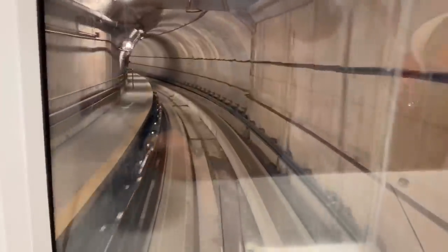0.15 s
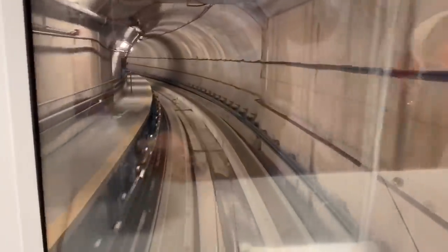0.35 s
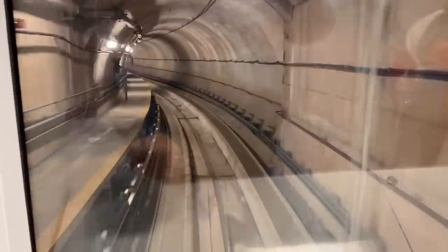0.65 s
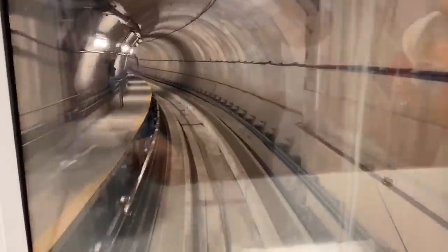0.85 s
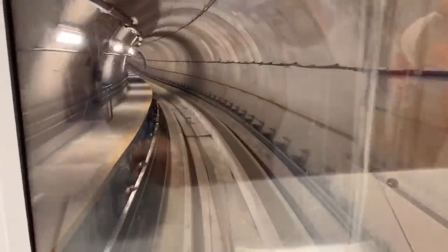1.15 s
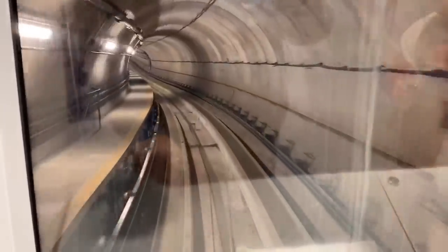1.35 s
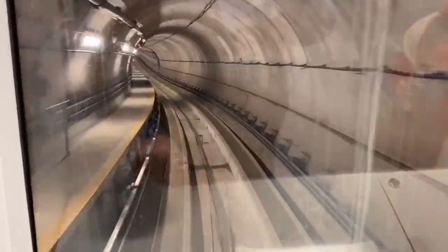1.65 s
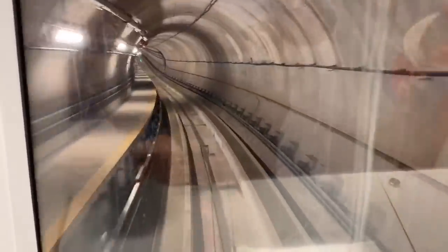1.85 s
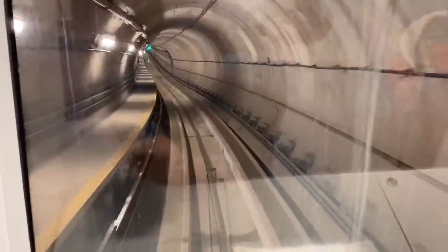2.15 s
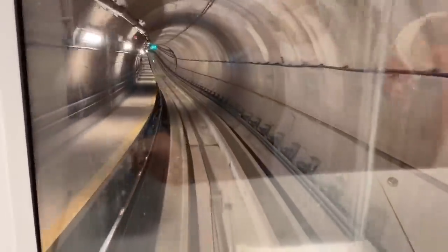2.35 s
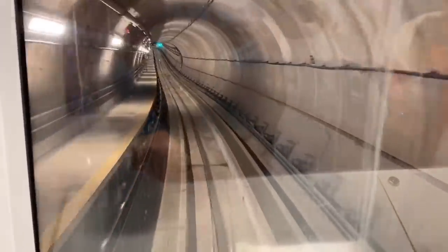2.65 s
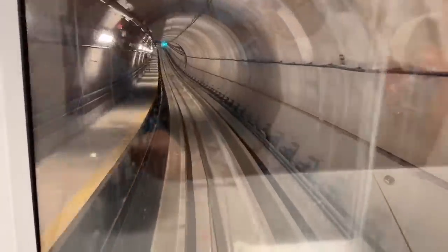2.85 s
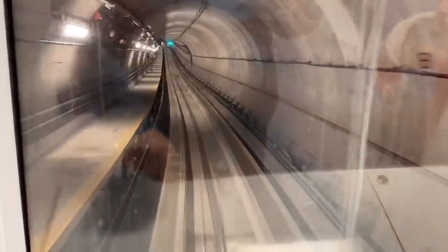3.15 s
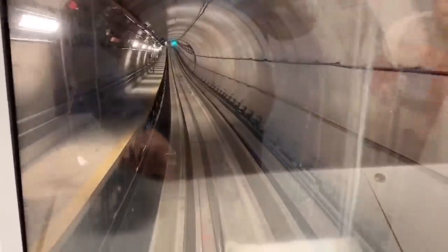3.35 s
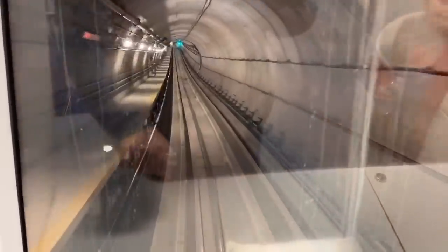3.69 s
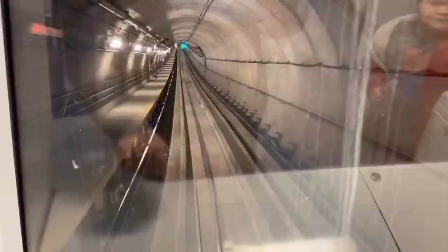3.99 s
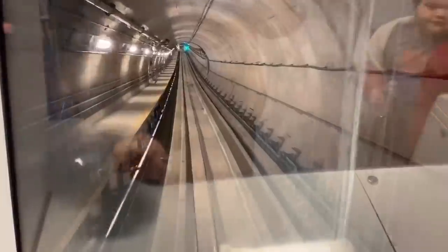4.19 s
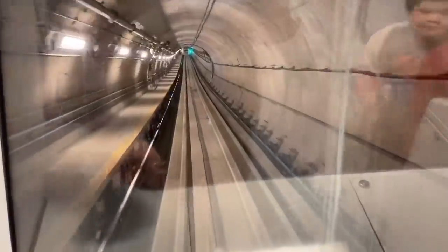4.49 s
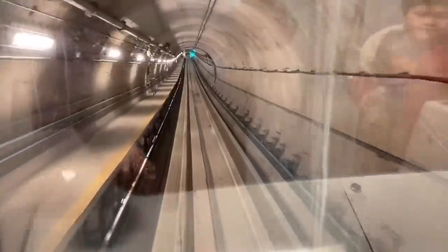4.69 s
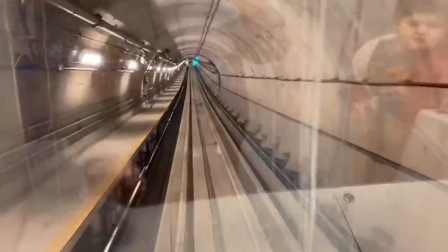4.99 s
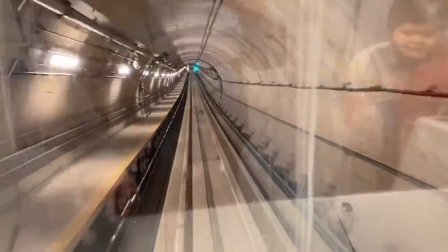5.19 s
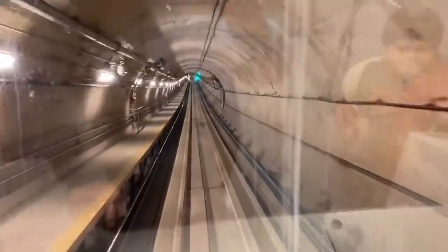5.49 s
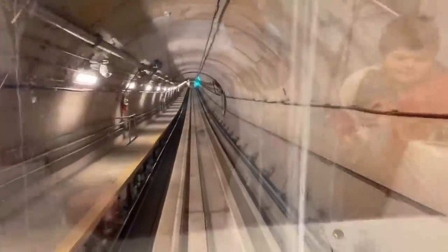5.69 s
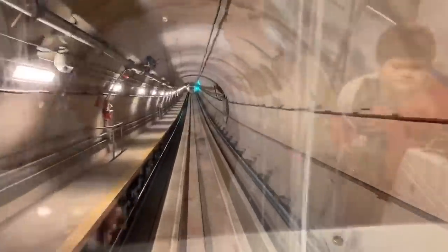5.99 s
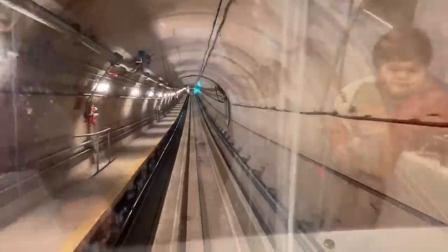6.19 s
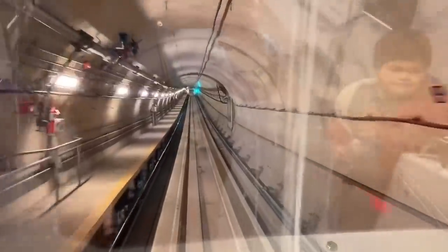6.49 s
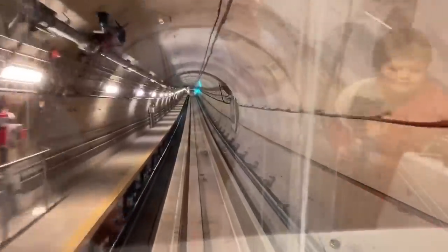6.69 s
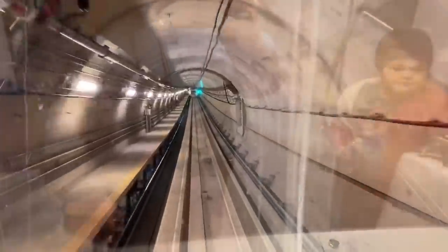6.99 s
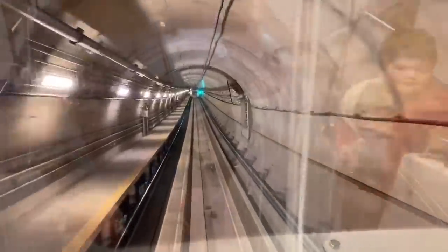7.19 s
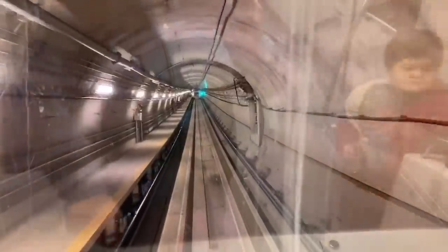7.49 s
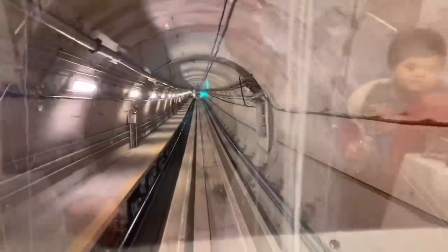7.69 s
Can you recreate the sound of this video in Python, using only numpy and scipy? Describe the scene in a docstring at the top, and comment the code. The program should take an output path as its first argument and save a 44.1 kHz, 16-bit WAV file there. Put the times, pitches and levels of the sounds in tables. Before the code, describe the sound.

Inside the front car of a rubber-tyred automated train at steady speed in a tunnel. Throughout, a heavy low boom around 60 Hz surges gently, with muffled tyre thudding, a wide mid-range tunnel roar and faint air hiss. A quiet, wavering electric whine near 1 and 2 kHz holds until about 3.9 s, then falls away; the motor hum remains and from 4.1 s creeps upward very slightly. Soft bumps come irregularly, clustered around 2, 3, 4.3-4.7 and 6.5 s, with dull falling knocks at 2.15, 2.9 and 6.5 s. Small sharp rail ticks snap at 0.35, 0.95, 3.65 and, strongest, 5.85 s. Brief swishes brush by at 0.2, 3.65, 4.6, 6.3 and 7.8 s. Thin, very high squeaks chirp sparsely, clearest at 1.7, 5.7 and 7.4 s, with faint rubbing from 3 to 5.7 s. The boom eases after 6.5 s; the whine begins returning at 7.75 s.

```python
"""Front car of a rubber-tyred automated train in a tunnel.
Filtered noise gives body boom, tyre thudding, tunnel roar and air hiss; bumps and falling knocks mark joints.
Three sine orders hum as the motor creeps up in pitch; the drive whines (noise bands and tones) while it pulls,
rests, then pulls again. The running gear sings in faint noise bands.
Collector shoes tick, swish, rub and squeak along the power rail as short shaped noise bursts."""
import sys
import numpy as np
from scipy import signal
from scipy.fft import rfft, irfft, next_fast_len
from scipy.io import wavfile
from scipy.ndimage import uniform_filter1d, map_coordinates

SR = 44100
rng = np.random.default_rng(int(sys.argv[2]) if len(sys.argv) > 2 else 0)


def wav_out(sig):
    """Save sig, one row per channel (or a flat mono array), as 16-bit PCM at SR to the path in sys.argv[1]."""
    wavfile.write(sys.argv[1], SR, np.round(np.clip(np.atleast_2d(sig).T, -1, 1) * 32767).astype(np.int16))


N = 345920

# Levels in the tables are relative, before mixing and panning.
# Car body resonances: (centre [Hz], width [Hz], level [dB])
BODY_MODES = [(39.6, 7.4, -7.5), (62, 3.7, 2.5), (72.4, 8.9, -5.5), (85, 10.7, -6), (97.6, 28, -12.5)]
# Cabin air resonances driven by the tyres: (centre [Hz], width [Hz], level [dB])
CABIN_MODES = [(134.6, 13, -1), (171.4, 13, 4.5), (200, 15, -3), (242, 22, -7.5), (295, 20, -8.5),
               (348.7, 27, -2), (372, 27, -7), (520, 18, -3)]
# Tunnel roar spectrum: (frequency [Hz], level [dB])
ROAR_SPECTRUM = [(100, -17), (300, -4), (450, 4.5), (515, 6), (610, -0.5), (690, 4), (760, 0), (880, 2.5),
                 (950, -2), (1050, 1), (1220, -2), (1330, -5.5), (2000, -10.5), (2800, -17), (4500, -26.5)]
# Air hiss spectrum: (frequency [Hz], level [dB])
HISS_SPECTRUM = [(1500, -29), (2500, -35), (3500, 6), (4600, 2.5), (5500, -2), (7500, -6), (9300, -12.5),
                 (10600, -8.5), (11600, -17), (12600, -24), (15500, -21.5)]
# Left-right likeness of the noises: (frequency [Hz], correlation [-1 to 1])
EAR_CORRELATION = [(70, .997), (100, .99), (140, .92), (200, .7), (300, .45), (370, .75), (520, .4),
                   (620, .3), (710, -.15), (850, .1), (1180, .25), (1800, -.05), (2400, .3), (3200, .1),
                   (4100, .3), (5000, -.1), (6500, .2), (8400, -.4), (10000, .7), (12000, -.4), (14000, .6)]
# Running surface, relative to cruise: (time [s], tyre thudding [dB], tunnel roar [dB])
SURFACE_LEVELS = [(0, -2, 0.3), (1.6, -2, -0.1), (2.15, 2, 1.9), (2.5, -2, 0.1), (3.55, 1, 0.9),
                  (4.05, -2, 0.4), (4.4, 0, 0.7), (5.35, -1.5, 0.5), (6, 0, 0.2), (6.25, -1.5, -0.7),
                  (6.5, 1.5, -0.5), (7.84, 1, 1.5)]
# Boom surges and sags as the car rides the beams: (middle [s], length [s], level change [dB])
BOOM_SURGES = [(0.306, 0.018, 9), (1.222, 0.028, 6), (1.37, 0.042, -6), (2.24, .05, 1),
               (2.348, 0.035, -7.5), (2.588, 0.031, -8), (2.992, 0.028, 8), (3.125, 0.03, 0.5),
               (3.287, 0.029, 5), (3.47, 0.088, -5), (3.724, 0.033, 4.5), (4.122, 0.023, 6.5),
               (4.285, 0.039, 6.5), (5.234, 0.028, 5), (5.33, .04, 5.5), (5.7, 0.041, -7), (6.42, .04, 3.5),
               (6.74, 0.034, 4), (6.89, 0.022, 5), (7.187, 0.087, -4.5), (7.757, 0.047, -8.5)]
# Motor orders: (time [s], first [dB], second [dB], third [dB])
MOTOR_ORDERS = [(0, -28.5, -51, -37), (0.7, -30, -37.5, -38), (1.5, -28.5, -34, -37.5),
                (2.6, -35, -39.5, -35.5), (3.65, -34, -29, -32), (4.05, -35, -33, -48),
                (4.6, -43, -30.5, -54), (5.4, -49, -27.5, -52), (5.85, -50, -31, -53),
                (6.25, -45, -40.5, -51), (6.6, -47, -37.5, -38), (7.2, -39, -31, -45),
                (7.84, -41, -28.5, -39)]
# Faint singing of the running gear: (centre [Hz], width [Hz], level [dB])
GEAR_BANDS = [(2540, 470, 0), (3160, 190, 5), (4900, 410, -8), (6120, 240, -10)]
# Whine bands of the drive: (centre [Hz], width [Hz], level [dB])
WHINE_BANDS = [(366, 70, -3), (827, 47, -7.5), (1000, 18, -3.5), (1184, 82, -4), (2005, 240, -11),
               (2970, 450, -11.5)]
# Wavering tones at their core: (pitch [Hz], stray [Hz], level [dB])
WHINE_CORES = [(1007, 5, -8.5), (2008, 16, -10.5)]
# Drive pulls: (start [s], end [s], level [dB])
DRIVE_PULLS = [(0, 3.85, -33), (7.76, 7.84, -34.5)]
# Broad swishes of the shoes: (middle [s], length [s], level [dB])
SHOE_SWISHES = [(0.206, 0.065, -38), (3.654, 0.084, -42), (4.612, 0.062, -35.5), (6.305, 0.11, -39.5),
                (7.785, 0.043, -36)]
# Swish spectrum: (frequency [Hz], level [dB])
SWISH_SPECTRUM = [(1500, 3), (4000, 8.5), (7000, -0.5), (10500, -5), (14000, -22)]
# Shoes over rail joints: (time [s], crack level [dB], ring [Hz], ring half-width [Hz],
# ring gain over the tick spectrum [dB], tail relative to crack [dB])
SHOE_TICKS = [(0.3434, -23.5, 5300, 1800, 0, -8), (0.9442, -21.5, 4750, 600, 7, -9),
              (3.665, -23.5, 4850, 340, 22, -6), (5.8396, -18.5, 4700, 600, 7, -10)]
# Tick spectrum: (frequency [Hz], level [dB])
TICK_SPECTRUM = [(1000, -3), (2500, 0), (3600, 6), (4600, -7), (6500, -8.5), (9000, -22), (14000, -33)]
# Tyres over uneven joints in the running beams: (middle [s], length [s], level [dB], centre [Hz])
BEAM_BUMPS = [(0.496, 0.1, -25.5, 163), (1.406, 0.035, -28.5, 350), (1.66, 0.035, -25, 160),
              (1.978, 0.28, -21, 36.2), (2.031, 0.13, -28, 270), (2.191, 0.075, -25, 365),
              (2.32, 0.06, -26, 165), (3.06, 0.057, -22.5, 151), (3.069, 0.025, -28.5, 360),
              (3.631, 0.099, -32, 376), (4.33, 0.095, -22, 137), (4.331, 0.04, -27.5, 255),
              (4.49, 0.053, -27, 280), (4.54, 0.037, -21.5, 160), (4.748, 0.044, -26, 360),
              (5.17, 0.04, -26, 151), (5.33, 0.04, -28, 150), (5.401, 0.04, -27, 330),
              (6.479, 0.054, -23.5, 366), (6.635, 0.043, -24, 518), (7.33, 0.061, -26.5, 510),
              (7.396, .15, -24, 37)]
# Thin squeaks of the shoes: (time [s], level [dB], pitch [Hz], width [Hz], early t60 [s])
SHOE_SQUEAKS = [(0.704, -49, 9200, 300, .25), (1.121, -46, 9550, 600, .2), (1.2565, -46.5, 9720, 500, .12),
                (1.709, -37.5, 9900, 900, 0.12), (1.749, -38.5, 9960, 250, 0.11),
                (2.268, -50, 9500, 700, .15), (2.931, -44.5, 9320, 300, .22), (3.012, -47, 9780, 300, .22),
                (3.375, -46, 9750, 400, .22), (3.87, -49, 9700, 800, 0.3), (4.359, -46, 9880, 180, .35),
                (5.083, -46, 9650, 500, .06), (5.171, -39.5, 9550, 500, 0.17), (5.305, -40, 9650, 900, .12),
                (5.4355, -43, 9900, 900, 0.22), (5.725, -33, 9560, 302, 0.15), (5.778, -45, 9470, 200, .2),
                (6.155, -46, 9200, 700, 0.11), (6.471, -38, 9900, 450, 0.1), (6.635, -50, 9820, 300, .22),
                (7.069, -46.5, 9300, 600, 0.36), (7.369, -33.5, 9730, 350, 0.12),
                (7.452, -46, 9500, 500, .14)]
# Tyre knocks on hard joints: (middle [s], level [dB], pitch near the middle [Hz])
JOINT_KNOCKS = [(2.152, -20.5, 234), (2.878, -24, 270.4), (6.478, -21.5, 247.5)]
# Shoes rubbing and singing on the rail: (middle [s], length [s], level [dB], pitch [Hz], width [Hz])
SHOE_RUBS = [(3.02, 0.22, -46, 4800, 450), (3.123, .02, -42, 4920, 250), (3.895, 0.04, -44, 5100, 110),
             (3.952, 0.055, -48, 5060, 110), (4.298, 0.075, -43, 4610, 260), (4.47, 0.13, -49, 4640, 170),
             (5.004, 0.014, -43, 4500, 150), (5.057, 0.095, -51, 4600, 150), (5.372, .07, -45, 2370, 260),
             (5.48, .07, -48, 5100, 450), (5.65, .15, -49.5, 4600, 150)]
# Side favoured by the cabin: (frequency [Hz], left minus right [dB])
CABIN_LEAN = [(92, -1), (140, 3.5), (210, 0.5), (330, -1), (500, 0.5), (770, 0.5), (1170, -1.5), (1790, -1),
              (2740, -1), (4190, 0), (6410, 2.0), (9810, -0.5)]

# Cruise levels; the boom eases late in the run
BOOM_DB, THUD_DB, ROAR_DB, HISS_DB = -17, -27.5, -27.5, -46
EASE_START_S, EASE_DB_PER_S = 6.5, 1.4
HISS_FADE_DB_PER_S = 0.23
# Motor pitch: steady, then rising
MOTOR_HZ, RISE_START_S, RISE_HZ_PER_S = 158.7, 4.1, 1.25
# Hum waver; the phase depth applies to the second and third orders
WAVER_DB, WAVER_RAD, WAVER_KNOTS_PER_S = 3, 0.48, 13
# Pitch jitter and fading of the whine tones
DITHER_KNOTS_PER_S, FADING_DB, FADING_KNOTS_PER_S = 60, 4.6, 20
PULL_RISE_DB_PER_S, PULL_FALL_DB_PER_S, IDLE_DB = 40, 50, -54
# A rub climbs while the shoe grips and lets go
RUB_RISE_HZ_PER_S, GRIP_DB, GRIP_KNOTS_PER_S = 300, 2, 55
KNOCK_FALL_OCTAVES_PER_S = 22
TOP_HZ = 15750


def amp(db):
    """Decibels to gain."""
    return 10 ** (np.asarray(db) / 20)


def unit(x):
    """Scale to rms 1."""
    return x / np.sqrt(np.mean(x ** 2) + 1e-20)


def along(points, hz):
    """Read (frequency, value) points on a log-frequency axis."""
    f, v = np.transpose(points)
    return np.interp(np.log(hz + 1), np.log(f + 1), v)


def curves(rows):
    """One value per sample for each column after the time."""
    time_s, *columns = np.transpose(rows)
    return [np.interp(np.arange(N) / SR, time_s, column) for column in columns]


def wobble(knots_per_s):
    """Smooth random curve through normally distributed knots."""
    knots = rng.standard_normal(int(N * knots_per_s / SR) + 4)
    return map_coordinates(knots, [np.arange(N) * knots_per_s / SR])


def swell(t, length_s):
    """Gaussian rise and fall around t = 0; the length is two standard deviations."""
    return np.exp(-2 * (t / length_s) ** 2)


def resonances(modes, hz):
    """Gain of independently driven resonances, summed in power."""
    power = 0
    for centre, width, db in modes:
        power = power + (amp(db) * hz * width) ** 2 / ((centre * centre - hz * hz) ** 2 + (hz * width) ** 2)
    return np.sqrt(power)


def narrow(bands, hz):
    """Gain of bands with steep skirts: squared resonances."""
    return sum(amp(db) * resonances([(centre, width, 0)], hz) ** 2 for centre, width, db in bands)


def noise(colour, size=N, correlation=EAR_CORRELATION):
    """Stereo noise of rms 1: colour(hz) sets the gain, the mid-side balance sets the ear correlation."""
    m = next_fast_len(size)
    hz = np.fft.rfftfreq(m, 1 / SR)
    turn = np.arccos(np.clip(along(correlation, hz), -1, 1)) / 2
    spectra = rfft(rng.standard_normal((2, m))) * colour(hz)
    mid, side = irfft(spectra * [np.cos(turn), np.sin(turn)], m)[:, :size]
    return unit(np.array([mid + side, mid - side]))


def even(x, span_s):
    """Even out chance swells of noise over the span."""
    power = uniform_filter1d(np.mean(x ** 2, axis=0), max(int(span_s * SR), 1))
    return x / np.sqrt(np.abs(power) + 1e-9)


def patchy(x, depth_db):
    """Noise whose colour wavers at random in patches of time and pitch."""
    z = signal.stft(x, nperseg=1024)[2]
    field = rng.standard_normal(z.shape[1:])
    for _ in range(2):
        field = uniform_filter1d(field, size=7, axis=0)
        field = uniform_filter1d(field, size=9, axis=1)
    wavering = signal.istft(z * amp(depth_db * unit(field)), nperseg=1024)[1]
    return unit(wavering[:, :N])


def add(track, time_s, sound):
    """Mix a stereo sound into the track."""
    start = max(round(time_s * SR), 0)
    track[:, start:start + sound.shape[1]] += sound[:, :max(N - start, 0)]


def body_boom(low_hz=32, high_hz=125):
    """The tyres shake the body modes; the boom surges and sags on the beams."""
    def colour(hz):
        return resonances(BODY_MODES, hz) / np.sqrt((1 + (low_hz / (hz + 1)) ** 6) * (1 + (hz / high_hz) ** 6))
    t = np.arange(N) / SR
    surge_db = sum(db * swell(t - middle_s, length_s) for middle_s, length_s, db in BOOM_SURGES)
    ease_db = EASE_DB_PER_S * np.maximum(t - EASE_START_S, 0)
    return amp(BOOM_DB + surge_db - ease_db) * even(noise(colour), span_s=0.101)


def rolling(cabin_hz=600, roar_hz=5000):
    """The tyres drive the cabin air, the tunnel throws their roar back, and air hisses."""
    t = np.arange(N) / SR
    thud_db, roar_db = curves(SURFACE_LEVELS)
    cabin = noise(lambda hz: resonances(CABIN_MODES, hz) / np.sqrt(1 + (hz / cabin_hz) ** 8))
    tunnel = noise(lambda hz: amp(along(ROAR_SPECTRUM, hz)) / np.sqrt(1 + (hz / roar_hz) ** 8))
    air = noise(lambda hz: amp(along(HISS_SPECTRUM, hz)))
    thud = amp(THUD_DB + thud_db + 0.97 * wobble(16)) * even(cabin, span_s=0.13)
    roar = amp(ROAR_DB + roar_db + 0.95 * wobble(16)) * patchy(tunnel, depth_db=1)
    hiss = amp(HISS_DB - HISS_FADE_DB_PER_S * t + 1.5 * wobble(22)) * patchy(air, depth_db=2)
    return thud + roar + hiss


def motor():
    """Three orders of the motor waver in level and phase; the upper two waver separately at each ear."""
    t = np.arange(N) / SR
    pitch_hz = MOTOR_HZ + RISE_HZ_PER_S * np.maximum(t - RISE_START_S, 0)
    phase = 2 * np.pi * np.cumsum(pitch_hz) / SR

    def wavering(level_db):
        return amp(level_db + WAVER_DB * wobble(WAVER_KNOTS_PER_S))

    first_db, second_db, third_db = curves(MOTOR_ORDERS)
    first = wavering(first_db) * np.sin(phase + wobble(WAVER_KNOTS_PER_S))
    hum = first * amp([[0.5], [-0.7]])
    for order, level_db in [(2, second_db), (3, third_db)]:
        ears = []
        for lead_rad in (1.1, 0):
            waver_rad = WAVER_RAD * wobble(WAVER_KNOTS_PER_S)
            ears.append(wavering(level_db) * np.sin(order * phase + waver_rad + lead_rad))
        hum = hum + np.array(ears) * amp([[-1.6], [1.2]])
    return hum


def gear(singing_db=-51, sway_db=2):
    """The running gear sings faintly in narrow bands, whether the drive pulls or not."""
    return amp(singing_db + sway_db * wobble(9)) * noise(lambda hz: narrow(GEAR_BANDS, hz))


def effort_db():
    """Drive level: linear dB ramps into and out of each pull, never below idle."""
    t = np.arange(N) / SR
    pulls = []
    for start_s, end_s, db in DRIVE_PULLS:
        rise_db = PULL_RISE_DB_PER_S * np.maximum(start_s - t, 0)
        fall_db = PULL_FALL_DB_PER_S * np.maximum(t - end_s, 0)
        pulls.append(db - rise_db - fall_db)
    return np.maximum(np.max(pulls, axis=0), IDLE_DB)


def drive(flutter_db=1, whistle_db=-67):
    """Switching-rate dither makes tones waver together inside smeared bands, under a steady thin whistle."""
    bands = noise(lambda hz: narrow(WHINE_BANDS, hz))
    dither = wobble(DITHER_KNOTS_PER_S)
    tones = np.zeros((2, N))
    for pitch_hz, stray_hz, db in WHINE_CORES:
        phase = 2 * np.pi * np.cumsum(pitch_hz + stray_hz * dither) / SR
        fading = amp(db + FADING_DB * np.tanh(wobble(FADING_KNOTS_PER_S)))
        for ear in range(2):
            ear_gain = 1 + wobble(FADING_KNOTS_PER_S) / 3
            tones[ear] += fading * ear_gain * np.sin(phase + wobble(FADING_KNOTS_PER_S))
    whine = amp(flutter_db * wobble(13)) * bands + tones
    whistle = noise(lambda hz: narrow([(11510, 130, 0)], hz), correlation=[(11500, -0.6)])
    return amp(effort_db()) * whine * amp([[-0.3], [0.3]]) + amp(whistle_db) * whistle


def swishes(trim_db=-2):
    """The sliding shoes swell into broad swishes."""
    t = np.arange(N) / SR
    pressure = sum(amp(db + trim_db) * swell(t - middle_s, length_s) for middle_s, length_s, db in SHOE_SWISHES)
    return pressure * noise(lambda hz: amp(along(SWISH_SPECTRUM, hz)))


def ticks(trim_db=0.5, attack_s=0.00052, crack_t60_s=0.0065, tail_t60_s=0.067):
    """A shoe snaps over a rail joint: a short ringing crack and its tail in the car."""
    out, t = np.zeros((2, N)), np.arange(SR // 5) / SR
    for time_s, db, ring_hz, half_width_hz, ring_db, tail_db in SHOE_TICKS:
        def colour(hz):
            ring = narrow([(ring_hz, 2 * half_width_hz, ring_db)], hz)
            return amp(along(TICK_SPECTRUM, hz)) * (1 + ring)
        decay = amp(-60 * t / crack_t60_s) + amp(tail_db - 60 * t / tail_t60_s)
        fade = (1 - np.exp(-t / attack_s)) * decay
        snap = even(noise(colour, size=len(t), correlation=[(4000, 0.32)]), span_s=0.004)
        add(out, time_s, amp(db + trim_db) * fade * snap)
    return out


def bumps(relative_width=0.29):
    """Uneven joints shake the car for a moment, each around its own pitch."""
    out, t = np.zeros((2, N)), np.arange(SR) / SR - 0.5
    for middle_s, length_s, db, centre_hz in BEAM_BUMPS:
        shake = noise(lambda hz: narrow([(centre_hz, relative_width * centre_hz, 0)], hz), size=SR)
        add(out, middle_s - 0.5, amp(db) * swell(t, length_s) * even(shake, span_s=0.057))
    return out


def squeaks(trim_db=-4, attack_s=0.00054, tail_db=-15, tail_t60_s=0.88,
            scuff_db=-6, scuff_width_hz=1300, scuff_t60_s=0.034):
    """Brief slips scuff a shoe and set it ringing very high, as dry chirps or thin notes."""
    out, t = np.zeros((2, N)), np.arange(SR // 3) / SR
    for time_s, db, pitch_hz, width_hz, t60_s in SHOE_SQUEAKS:
        def band(breadth_hz):
            return noise(lambda hz: narrow([(pitch_hz, breadth_hz, 0)], hz),
                         size=len(t), correlation=[(10000, 0.68)])
        fade = np.maximum(amp(-60 * t / t60_s), amp(tail_db - 60 * t / tail_t60_s))
        ring = fade * even(band(width_hz), span_s=0.041)
        scuff = amp(scuff_db - 60 * t / scuff_t60_s) * band(scuff_width_hz)
        add(out, time_s, amp(db + trim_db) * (1 - np.exp(-t / attack_s)) * (ring + scuff))
    return out


def knocks(length_s=0.044, ear_spread_rad=0.55):
    """A hard joint sends a bending wave along the beam: its higher pitches arrive first."""
    out, t = np.zeros((2, N)), np.arange(SR // 4) / SR - 1 / 8
    for middle_s, db, centre_hz in JOINT_KNOCKS:
        pitch_hz = centre_hz * 2 ** (-KNOCK_FALL_OCTAVES_PER_S * t)
        phase = 2 * np.pi * (np.cumsum(pitch_hz) / SR + rng.random())
        ear_phase = ear_spread_rad * rng.standard_normal((2, 1))
        add(out, middle_s - 1 / 8, amp(db) * swell(t, length_s) * np.sin(phase + ear_phase))
    return out


def rubs(trim_db=-1):
    """Shoes grip and let go: noise bands with a fluttering level, slightly rising in pitch."""
    out, t = np.zeros((2, N)), np.arange(SR) / SR - 0.5
    for middle_s, length_s, db, pitch_hz, width_hz in SHOE_RUBS:
        song = noise(lambda hz: narrow([(pitch_hz, width_hz, 0)], hz), size=SR)
        # growing frequency shift, zero at the middle
        rising = np.real(signal.hilbert(song) * np.exp(1j * np.pi * RUB_RISE_HZ_PER_S * t ** 2))
        grip = amp(GRIP_DB * wobble(GRIP_KNOTS_PER_S)[:SR])
        add(out, middle_s - 0.5, amp(db + trim_db) * swell(t, length_s) * grip * rising)
    return out


def scene():
    """Everything as heard behind the front window."""
    running = body_boom() + rolling() + motor() + gear() + drive()
    shoes = swishes() + ticks() + squeaks() + rubs()
    return running + shoes + bumps() + knocks()


def record(dry):
    """Each side takes its own colour from the cabin; nothing is kept above the band limit."""
    m = next_fast_len(N + SR // 2)
    hz = np.fft.rfftfreq(m, 1 / SR)
    sides = amp(along(CABIN_LEAN, hz) * np.array([[0.5], [-0.5]]))
    return irfft(rfft(dry, m) * sides * (hz < TOP_HZ), m)[:, :N]


dry = scene()
out = record(dry)
wav_out(out)
```